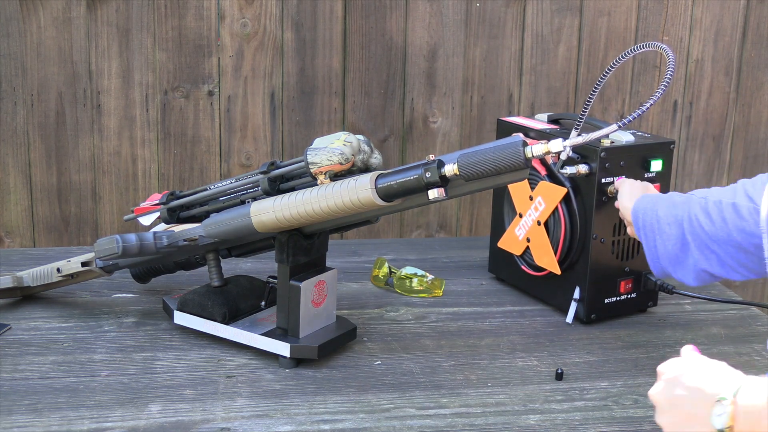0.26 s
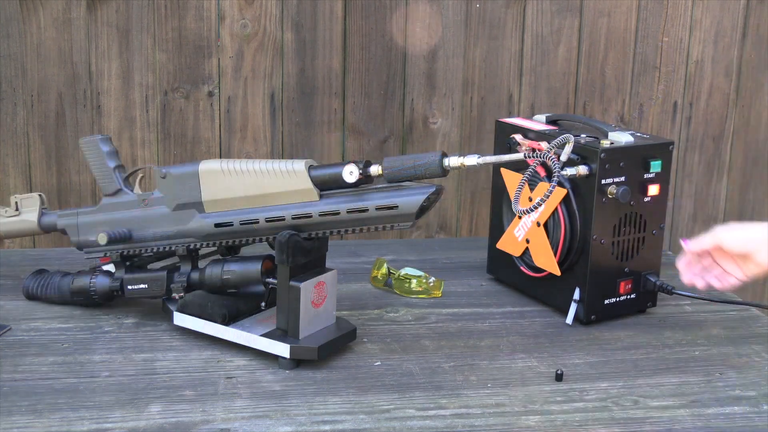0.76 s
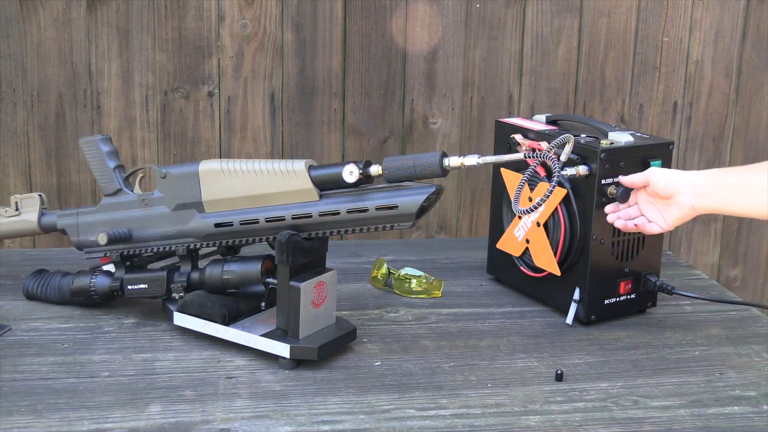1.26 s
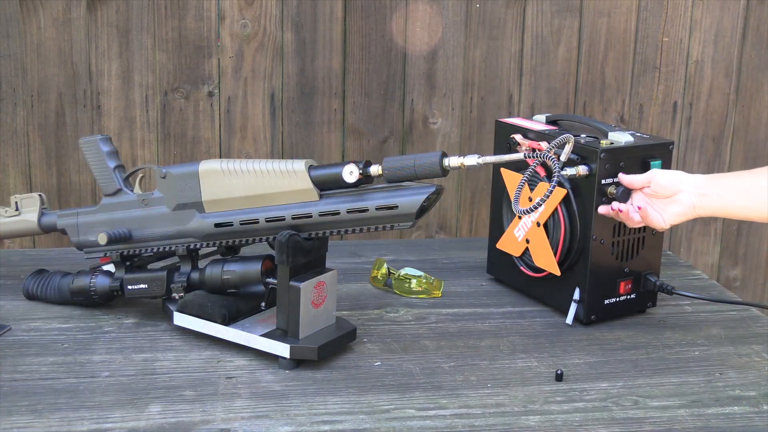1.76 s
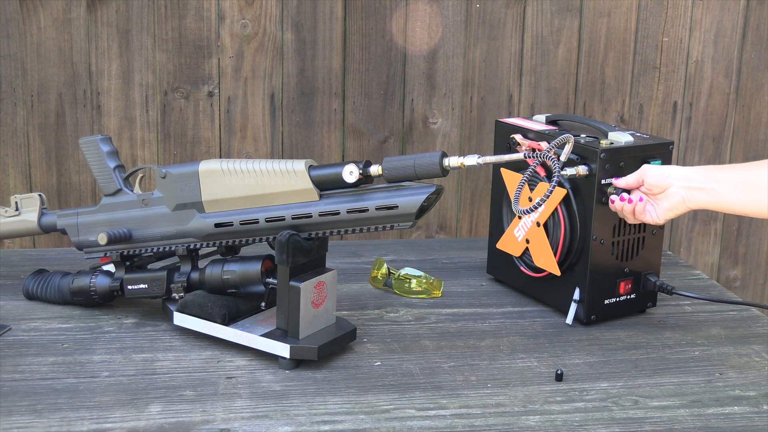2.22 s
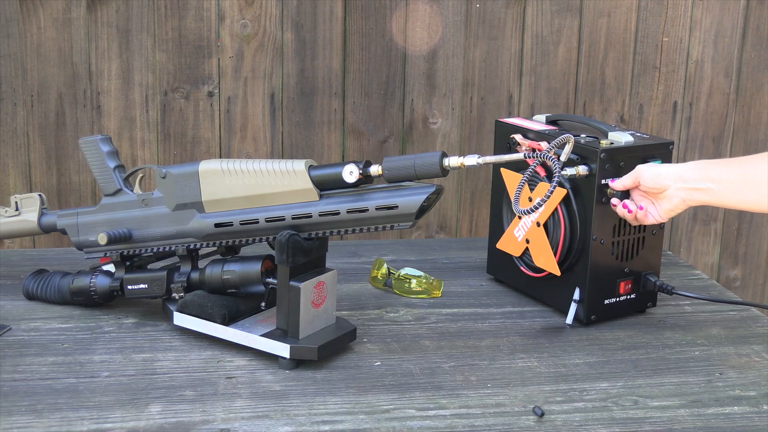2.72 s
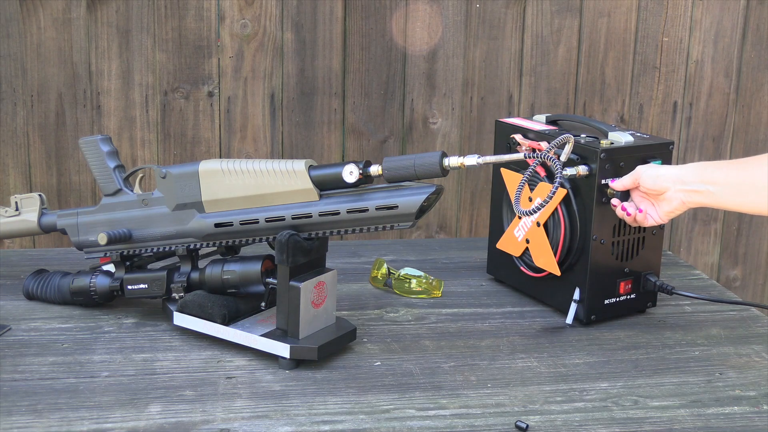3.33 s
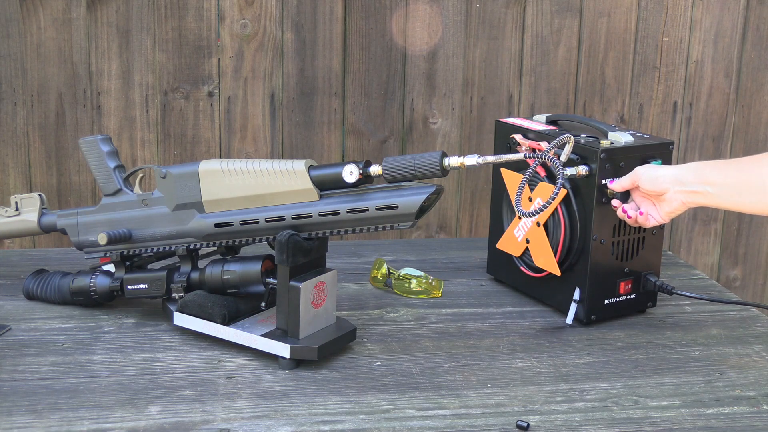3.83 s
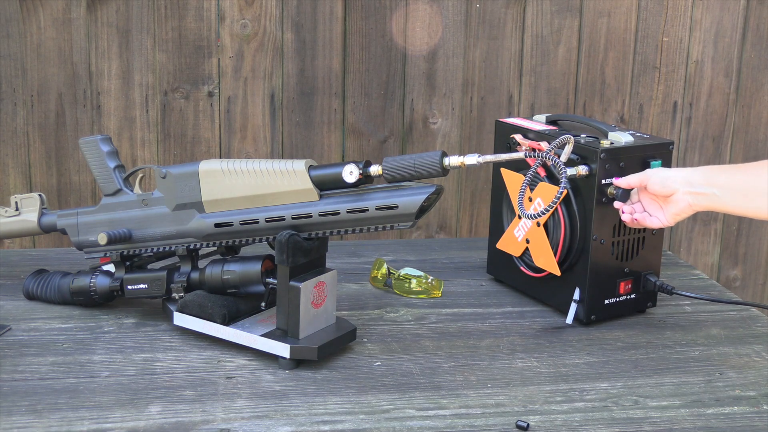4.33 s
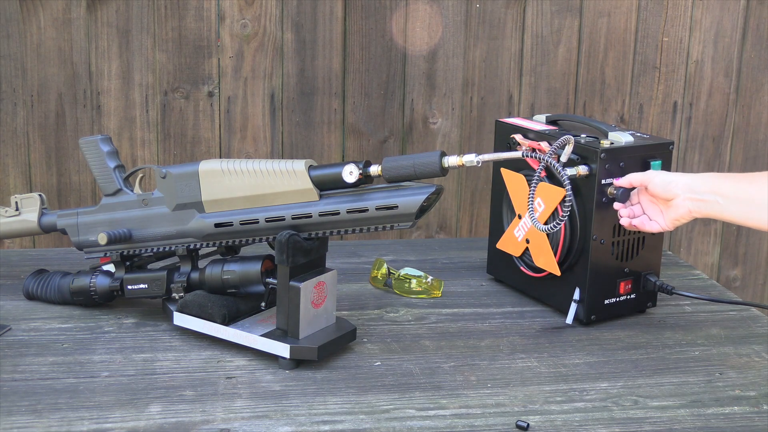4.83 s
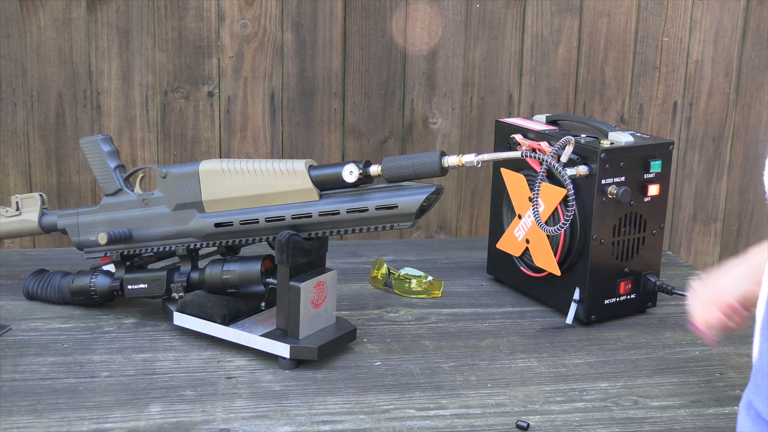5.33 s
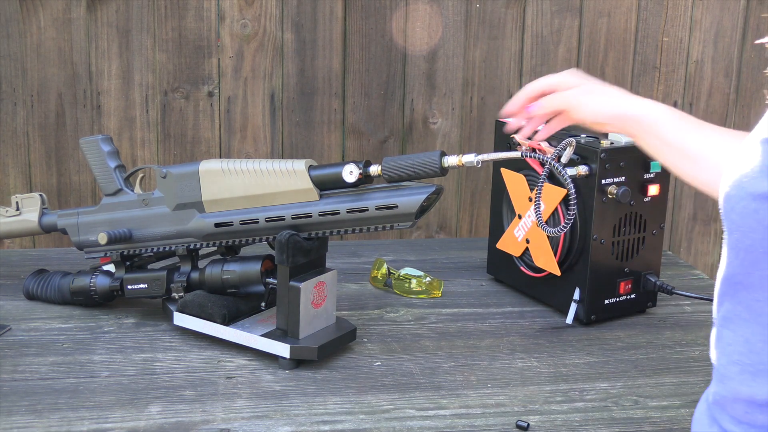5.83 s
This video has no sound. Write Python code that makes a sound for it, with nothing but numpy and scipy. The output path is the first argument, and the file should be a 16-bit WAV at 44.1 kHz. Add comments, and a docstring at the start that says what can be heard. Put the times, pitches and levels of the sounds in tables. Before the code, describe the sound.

A portable air compressor runs close by outdoors. It makes about five quick, hooting pump strokes, the last ones weaker, and stops by 0.7 seconds. Its cooling fans carry on throughout with a steady airy whir, a low hum and a thin, slightly wavering whine. At about 2.5 seconds a bleed valve opens with a soft puff, and compressed air rushes out in a loud, bright hiss. A rough, sputtering whistle starts very high and slides down until about 4.2 seconds, catching in brief squeals around 3 seconds and again between 3.6 and 4.3. The fans drop in level while the jet is strong. The hiss weakens, gives a small second spurt near 4.4 seconds and is spent just before 5. The fan noise comes back up as the air fades and continues alone until the end, at about 6 seconds.

```python
"""Letting the air out of a compressor

A portable air compressor on a wooden table outdoors makes its last strokes; its cooling fans hum on.
A hand opens the bleed valve: air hisses out with a ragged whistle that falls as the hose empties.
The jet is strongest at the top of hearing, so a gain control turns everything down until it is spent."""
import sys
import numpy as np
from scipy import signal
from scipy.fft import rfft, irfft
from scipy.io import wavfile
from scipy.ndimage import uniform_filter1d

SR = 44100
rng = np.random.default_rng(int(sys.argv[2]) if len(sys.argv) > 2 else 0)


def waveform_to_disk(signal):
    """Save audio, clipped to [-1, 1], as 16-bit WAV at the path in sys.argv[1]."""
    frames = np.transpose(np.atleast_2d(signal))
    scaled = np.clip(frames, -1, 1) * 32767
    samples = np.round(scaled).astype(np.int16)
    wavfile.write(sys.argv[1], SR, samples)


N = 267771
TIME = np.arange(N) / SR
BINS = np.fft.rfftfreq(2048, 1 / SR)

# Piston strokes. Each row: time in seconds, level in dB.
STROKES = [(0.072, -22.5), (0.22, -21.5), (0.364, -22.5), (0.511, -28), (0.662, -40)]
# The tone colour of each noise. Each row: frequency in Hz, relative level in dB.
MOTOR_COLOUR = [(60, -19), (200, -21), (330, 5), (540, 0.5), (750, -0.5), (920, -0.5), (1040, -21),
                (1300, -3), (1750, -9.5), (2200, -11.5), (4500, -15), (8000, -17.5), (11500, -38)]
ROAR_COLOUR = [(40, -30), (110, -14), (200, -12), (290, -4), (500, -9.5), (850, -6), (1100, -7.5),
               (1450, -3), (1800, -7.5), (2050, -9.5), (2700, -11), (3800, -12.5), (7000, -44.5)]
GRILLE_COLOUR = [(1500, -22), (3000, -15), (4400, -3.5), (5150, 2.5), (5800, -0.5), (7000, -1), (8600, -2),
                 (10000, -7.5), (11200, -12), (12000, -58)]
JET_HISS_COLOUR = [(300, -21), (800, -11), (1500, -10.5), (2500, -6.5), (3500, -2), (4500, -2), (5100, -4),
                   (6200, 0.5), (7500, 3.5), (8700, 4), (10000, -1), (11000, -1), (12000, -4)]
JET_TOP_COLOUR = [(12000, -47), (14000, -2.5), (17000, -31), (21000, 4.5)]
# How the steel case and the valve's bore ring. Each row: frequency in Hz, width in Hz, strength in dB.
CASE_RINGS = [(187.8, 28.6, 10.5), (386.3, 108, 12), (685, 132, 18.5), (766, 29, 10), (967, 90, 7),
              (1238, 25, 10)]
BORE_RINGS = [(3527, 149, 1), (4480, 247, 2.5), (6070, 380, 1), (6750, 370, 2), (8053, 170, 4),
              (8800, 220, -1)]
# The fans' roar. Each row: time in seconds, level in dB.
ROAR_LEVEL = [(0, -33), (.65, -36.5), (1.2, -34), (2.45, -33.5), (5.2, -35.5), (5.8, -33)]
# The whine of fans A, B and C. Each row: time in seconds, pitch in Hz.
WHINE_A = [(0, 1607), (.44, 1605), (.5, 1570), (1.1, 1551), (2.2, 1571), (5.25, 1580), (6.05, 1564)]
WHINE_B = [(.4, 1704), (.8, 1710), (6.05, 1711)]
WHINE_C = [(.9, 1868), (2.5, 1876), (4.7, 1882), (5.1, 1896), (6.05, 1889)]
# The fans' tones. Each row: time in seconds, then levels in dB of fan A, fan B, fan C and the hum.
TONE_LEVELS = [(.3, -47, -40.5, -64, -44), (.7, -44.5, -53, -53, -47.5), (1.5, -44.5, -44.5, -55, -46.5),
               (2.45, -46.5, -47.5, -52.5, -44.5), (4.95, -44.5, -47.5, -49.5, -53.5),
               (5.8, -42, -43.5, -45.5, -54)]
# The octave above fan B's whine. Each row: time in seconds, level in dB.
OCTAVE_LEVEL = [(0, -49.5), (.38, -46), (.88, -54), (1.25, -56), (5.1, -53.5), (5.42, -50.5), (5.7, -55)]
# Fan B's third and fourth harmonics, each a level in dB.
OVERTONE_DB = [-56, -60]
# Turns of the valve. Each row: start, opening time and hold time in seconds, full-flow hiss in dB.
VALVE_TURNS = [(2.492, 0.0053, 1.59, -12.5), (4.319, .075, 0.082, -15.5)]
# The whistle at the valve seat. Each row: time in seconds, pitch in Hz.
WHISTLE_PITCH = [(2.497, 4800), (2.535, 5100), (2.6, 4700), (2.84, 4000), (3.01, 3180), (3.43, 2550),
                 (3.7, 1830), (3.95, 1220), (4.12, 1060)]
# The whistle's main note, then its octave. Each row: starting level in dB, dB lost per octave of fall.
WHISTLE_PARTS = [(-19.5, 2.07), (-15, 8.5)]
# Squeals, where the whistle briefly locks on and its octave leaps out.
# Each row: time in seconds, half length in seconds, pitch change as a share, octave level in dB.
SQUEALS = [(2.946, 0.019, .17, -17), (3.088, .011, 0.27, -11.5), (3.634, .011, .24, -28),
           (3.873, .03, .16, -19.5), (4.216, .035, -.06, -24), (4.322, 0.014, -0.036, -23)]
VALVE_OPENS_S = VALVE_TURNS[0][0]


def amp(db):
    """Turns decibels into a gain."""
    return 10 ** (np.asarray(db) / 20)


def unit(x):
    """Scales a signal to an average strength (rms) of 1."""
    return x / np.sqrt(np.mean(x ** 2) + 1e-20)


def curves(rows):
    """Joins each column of a table with straight lines over time."""
    times, *columns = np.transpose(rows)
    return [np.interp(TIME, times, column) for column in columns]


def colour(points):
    """Joins (Hz, dB) points into a spectrum."""
    hz, db = np.transpose(points)
    return np.interp(np.log(BINS + 1), np.log(hz), db)


def resonance(hz, width):
    """A peak of power around one ringing frequency."""
    return 1 / (1 + (2 * (BINS - hz) / width) ** 2)


def wander(rate_hz):
    """A smooth random wobble, up to about the given rate."""
    hz = np.fft.rfftfreq(N, 1 / SR)
    return unit(irfft(rfft(rng.standard_normal(N)) * np.exp(-(hz / rate_hz) ** 2), N))


def turbulence(spectrum_db, patchy_db):
    """Coloured noise whose strength drifts in patches of time and frequency."""
    real, imaginary, patches = rng.standard_normal((3, N // 512 + 5, len(BINS)))
    patches = uniform_filter1d(patches, size=9, axis=0)
    patches = unit(uniform_filter1d(patches, size=14, axis=1))
    frames = (real + 1j * imaginary) * amp(spectrum_db + patchy_db * patches)
    return unit(signal.istft(frames.T, nperseg=2048, noverlap=1536)[1][:N])


def tone(hz):
    """A pure tone that follows a pitch curve."""
    return np.sqrt(2) * np.sin(2 * np.pi * (np.cumsum(hz) / SR + rng.random()))


def swell(at, rise, fall):
    """Rises to 1 and falls again; times are in seconds."""
    t = TIME - at
    return np.exp(-(t / np.where(t < 0, rise, fall)) ** 2)


def fade_in(start, rise_s):
    """Rises from 0 to 1 after the start."""
    return np.clip((TIME - start) / rise_s, 0, 1)


def fade_out(start, db_per_s):
    """Holds at 1, then dies away after the start."""
    return amp(-db_per_s * np.maximum(TIME - start, 0))


def pump(intake_hz=440, valve_hz=185, motor_off_s=0.31):
    """Each stroke loads the motor, hoots in the intake, puffs, and ends in a falling valve flutter."""
    air_colour = colour([(400, -29), (720, -10), (830, -6), (915, 17), (1020, 2), (1160, 17),
                         (1500, -33), (4000, -42)])
    air = turbulence(air_colour, patchy_db=1)
    motor = turbulence(colour(MOTOR_COLOUR), patchy_db=3)
    out = amp(-35) * fade_out(motor_off_s, db_per_s=70) * motor  # coasts to a stop
    for at, db in STROKES:
        hoot_hz = intake_hz * (1 - 0.021 * np.tanh((TIME - at) / 0.0052))
        hoot = tone(hoot_hz) * swell(at, rise=0.017, fall=0.011)
        shut = at + 0.0419
        sag = np.exp(-np.maximum(TIME - shut, 0) / 0.004)
        flutter = tone(valve_hz * (1 + 1.1 * sag)) * swell(shut, rise=0.022, fall=0.031)
        flutter *= amp(-10 + 2.6 * wander(150))
        push = (amp(-14) * air + amp(-13) * motor) * swell(at + 0.025, rise=0.047, fall=0.036)
        out += amp(db) * (hoot + flutter + push)
    return out


def fan_air(hand_comes_s=0.61, hand_leaves_s=4.45):
    """Air roars through the case and hisses at the grille; one band swells as the hand comes near."""
    case_db = sum(lift * resonance(hz, width) for hz, width, lift in CASE_RINGS)
    roar = amp(curves(ROAR_LEVEL)[0]) * turbulence(colour(ROAR_COLOUR) + case_db, patchy_db=0.13)
    hiss = amp(-42.5 + 0.2 * wander(8.7)) * turbulence(colour(GRILLE_COLOUR), patchy_db=1.5)
    hand = fade_in(hand_comes_s, rise_s=1.4) * fade_out(hand_leaves_s, db_per_s=26)
    rush = turbulence(colour([(2000, -21.5), (2300, 1), (2900, -5.5), (3600, -23)]), patchy_db=3)
    return roar + hiss + (amp(-55) + amp(-47) * hand) * rush


def whine(pitches, multiple=1, waver=0.00076, flutter_db=1.88):
    """One tone of a fan; swirling air makes it waver and flutter."""
    hz = curves(pitches)[0] * (1 + waver * wander(16.2))
    return tone(multiple * hz) * amp(flutter_db * wander(41))


def fan_tones(hum_hz=372, blades_db=-45.5):
    """Three fans whine, with overtones, a blade tone and a low fluttering hum."""
    *whines_db, hum_db = curves(TONE_LEVELS)
    out = sum(amp(db) * whine(pitches) for db, pitches in zip(whines_db, (WHINE_A, WHINE_B, WHINE_C)))
    for multiple, db in enumerate([*curves(OCTAVE_LEVEL), *OVERTONE_DB], 2):
        out += amp(db + 2.5 * wander(5.4)) * whine(WHINE_B, multiple)
    blades = whine(WHINE_A, multiple=0.5) * amp(blades_db + 1.5 * wander(9.8))
    hz = hum_hz * (1 + 0.00825 * wander(13.3))
    hum = tone(hz) * amp(hum_db + 3 * wander(7.2))
    shaft = tone(hz / 2) * amp(hum_db - 8.5 + 2.5 * wander(15))
    return out + blades + hum + shaft


def breeze(level_db=-59, gust_db=-55):
    """Moving air rumbles faintly, with one gust."""
    strength = amp(level_db) + amp(gust_db) * swell(1.29, rise=0.14, fall=0.16)
    return strength * turbulence(colour([(25, 3), (55, 7), (90, -20), (400, -54)]), patchy_db=0)


def air_jet(empty_s=4.933, drain_s=0.86):
    """A fine jet shrills, hisses, whistles and rings the valve's bore until the pressure gives out."""
    pressure = np.clip((empty_s - TIME) / drain_s, 0, 1)
    # The valve cracks open quickly, then widens.
    gap = 0.46 * fade_in(VALVE_OPENS_S, rise_s=0.024) + 0.54 * fade_in(VALVE_OPENS_S, rise_s=0.18)
    flow = sum(amp(db) * fade_in(start, opening) * fade_out(start + held, db_per_s=33)
               for start, opening, held, db in VALVE_TURNS)
    top = amp(-4.6) * gap * pressure ** 1.11 * turbulence(colour(JET_TOP_COLOUR), patchy_db=1)
    sputter = amp(0.5 * wander(48))
    hiss = flow * gap * pressure ** 0.62 * sputter * turbulence(colour(JET_HISS_COLOUR), patchy_db=0.5)
    bore_db = 20 * np.log10(sum(amp(db) * resonance(hz, width) for hz, width, db in BORE_RINGS))
    bore = amp(-23) * fade_in(3.3, rise_s=0.25) * pressure * turbulence(bore_db, patchy_db=1)
    return top + bore + add_echoes(hiss + whistle())


def puff(level_db=-37, rise_s=0.062):
    """The first rush of air out of the valve gives a soft low push."""
    envelope = fade_in(VALVE_OPENS_S, rise_s) * fade_out(VALVE_OPENS_S + rise_s, db_per_s=55)
    air = turbulence(colour([(40, -16), (110, -12), (180, 3), (280, -3), (500, -25)]), patchy_db=2)
    return amp(level_db) * envelope * air


def add_echoes(sound):
    """The knob, the case, the table and the fence each throw the jet's sound back."""
    # Each pair: delay in seconds, gain.
    echoes = [(0.00124, 0.086), (0.0021, 0.08), (0.0034, 0.036), (0.0072, 0.25), (0.0125, 0.022)]
    bounced = sum(gain * np.interp(TIME - delay, TIME, sound, left=0) for delay, gain in echoes)
    return (sound + bounced) / np.sqrt(1 + sum(gain ** 2 for _, gain in echoes))


def whistle(fade_from_s=4.16, rough_db=3, fuzz=0.28):
    """Air over an edge sings a rough note and its octave, weaker as the pitch sinks with the pressure."""
    start, start_hz = WHISTLE_PITCH[0]
    hz = curves(WHISTLE_PITCH)[0]
    octaves_down = np.log2(start_hz / hz)
    envelope = fade_in(start, rise_s=0.035) * fade_out(fade_from_s, db_per_s=71)
    levels = [envelope * amp(db - loss * octaves_down) for db, loss in WHISTLE_PARTS]
    jitter = 0.016 + 0.046 * fade_in(start, rise_s=0.401) ** 2  # pitch shakes as the flow turns ragged
    jitter += 0.0347 * swell(start, rise=0.032, fall=0.032)  # the whistle bursts open rough
    for at, half_length, bend, octave_db in SQUEALS:
        lock = swell(at, half_length, half_length)
        hz *= 1 + bend * lock
        jitter *= 1 - 0.5 * lock
        levels[1] = levels[1] * (1 - lock) + amp(octave_db) * lock
    hz *= 1 + jitter * (wander(80) + wander(600))
    out = np.zeros(N)
    for multiple, level in enumerate(levels, 1):
        sputter = amp(rough_db * wander(210)) + fuzz * wander(660)
        out += level * tone(multiple * hz) * unit(sputter)
    return out


def scene():
    """All the sounds come from one spot, so left and right are the same."""
    return np.tile(pump() + fan_air() + fan_tones() + air_jet() + puff() + breeze(), (2, 1))


def record(dry, threshold_db=-19, squeeze=0.88, forget_db_per_s=36, listen_s=0.029, cutoff_hz=11900):
    """Loud treble turns the gain down fast and it recovers slowly; then the highest treble is cut."""
    treble = np.diff(dry[0], prepend=0)
    step = 1 / (listen_s * SR)
    power_db = 10 * np.log10(signal.lfilter([step], [1, step - 1], treble ** 2) + 1e-12)
    fall = TIME * forget_db_per_s
    held_db = np.maximum.accumulate(power_db + fall) - fall  # each peak is held and slowly let go
    gain = amp(-squeeze * np.maximum(held_db - threshold_db, 0))
    low_pass = signal.firwin(511, cutoff_hz, window=("kaiser", 9), fs=SR)
    return signal.oaconvolve(dry * gain, low_pass[None], "same")


dry = scene()
out = record(dry)
waveform_to_disk(out)
```